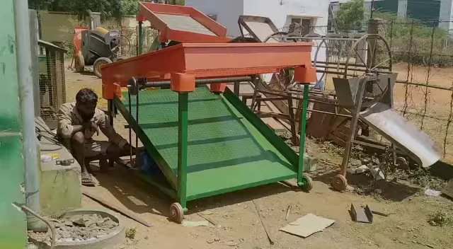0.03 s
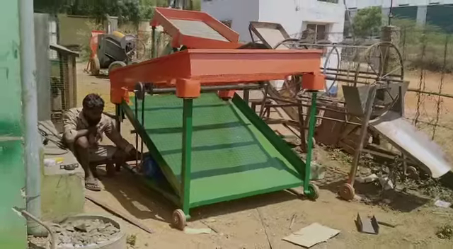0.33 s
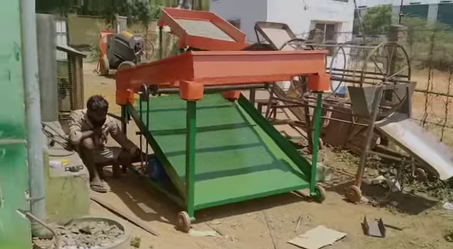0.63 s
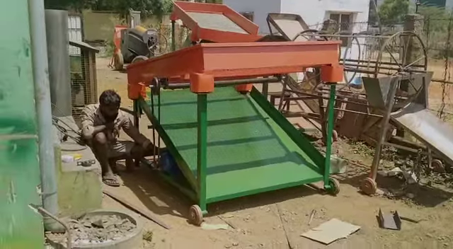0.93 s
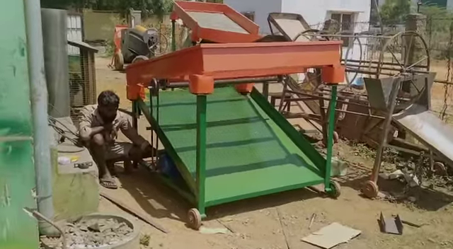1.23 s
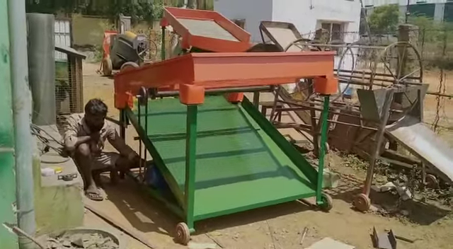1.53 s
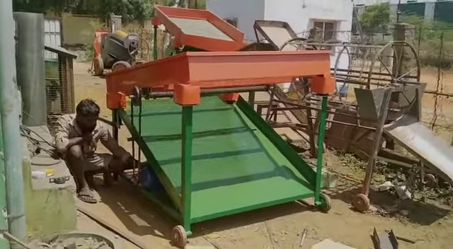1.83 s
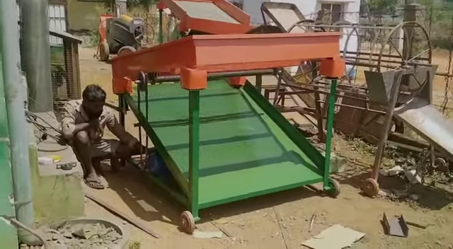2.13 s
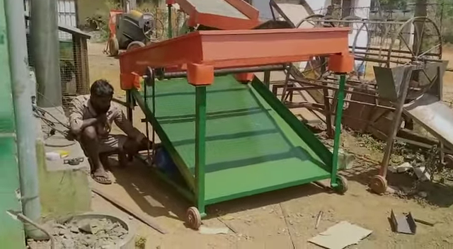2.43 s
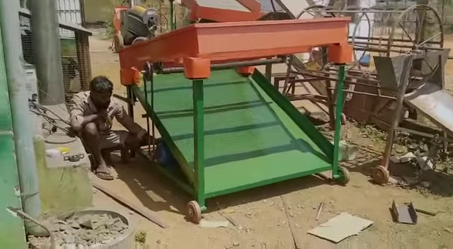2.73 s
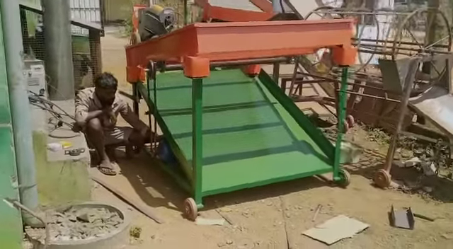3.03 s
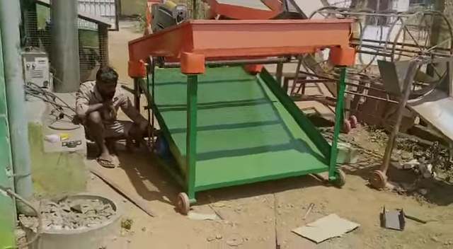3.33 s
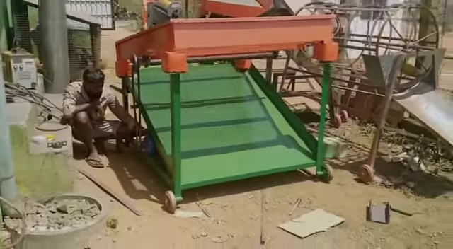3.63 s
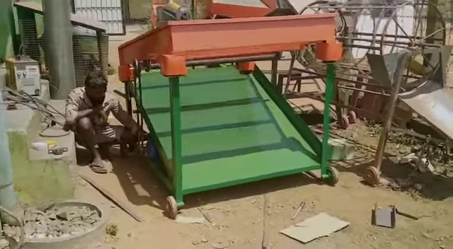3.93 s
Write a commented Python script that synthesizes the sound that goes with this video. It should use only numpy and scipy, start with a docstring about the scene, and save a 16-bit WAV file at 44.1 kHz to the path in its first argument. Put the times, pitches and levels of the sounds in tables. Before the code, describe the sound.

A sieving machine runs outdoors, heard from nearby. Bright metallic chatter swells and drops back twice, then swells again, while the motor hums underneath. Quick rasping strokes stand out in the gaps, and a loose part clinks once.

```python
"""Sieving machine in a yard

A motor-driven sieve shakes in the open air. Its steel screen chatters in surges: dense tiny
contacts sizzle in the mesh while heavier ones ring the tray and frame. In the lulls, strokes of
the shaker stand out as short rasps and a loose part clinks once, over the drive's hum and rumble."""
import sys
import numpy as np
from scipy import signal
from scipy.fft import rfft, irfft, next_fast_len
from scipy.io import wavfile
from scipy.ndimage import uniform_filter1d, map_coordinates

SR = 44100
rng = np.random.default_rng(int(sys.argv[2]) if len(sys.argv) > 2 else 0)


def wav_out(sig):
    """Save sig, one row per channel (or a flat mono array), as 16-bit PCM at SR to the path in sys.argv[1]."""
    wavfile.write(sys.argv[1], SR, np.round(np.clip(np.atleast_2d(sig).T, -1, 1) * 32767).astype(np.int16))


N = 176400

START_S, TOP_HZ = .111, 15750
STROKE_HZ, FIRST_STROKE_S = 12.42, .1422

# tone colour of the drive's rumble and rush (frequency [Hz], gain [dB])
DRIVE_COLOUR = [(15, -8), (25, -3), (50, -8), (84, -2), (148, -9), (216, -4.5), (290, -5), (360, -9.5),
                (460, -5), (560, -9.5), (670, -4.5), (850, -4), (1420, -9), (1670, -7), (2400, -10.5),
                (3360, -13.5), (3700, -16.5), (4900, -32), (7750, -26), (11600, -42), (15600, -27)]
# faders of the drive's noise (time [s], relative rumble level [dB], relative belt level [dB])
DRIVE_FADERS = [(0.12, -48, -54), (0.8, -43.5, -48.5), (1.5, -43.5, -43), (2.05, -41.5, -43),
                (2.25, -42.5, -44), (2.9, -43.5, -43), (3.3, -43.5, -43.5), (4.0, -45, -36.5)]
# hum lines of the drive (frequency [Hz], base level [dB])
HUM_LINES = [(74.8, -57.5), (99.3, -61), (136.5, -55.5), (200, -65)]
# fader of the hum as the machine gets nearer (time [s], gain [dB])
HUM_FADER = [(.12, 0.5), (1.2, -3), (2.3, .5), (3.0, -0.5), (4.0, 2.5)]
# a loose part clinks (time [s], relative level [dB])
CLINK_CUES = [(3.316, -31)]
# strokes that stand out as a rasp (time [s], relative level [dB])
RASP_CUES = [(0.7864, -26), (1.9954, -26.5), (2.0767, -26), (2.0974, -27.5), (2.156, -33), (2.7214, -25),
             (2.7975, -27), (2.8818, -27.5), (2.9624, -30), (3.042, -27), (3.122, -26), (3.2041, -31),
             (3.2829, -28.5)]
# the mesh breaks loose into chatter (time [s], relative level [dB])
CATCH_CUES = [(0.8415, -18.5), (2.2368, -22.5), (3.335, -22.5)]
# tone colour of a rasp (frequency [Hz], gain [dB])
RASP_COLOUR = [(500, -10), (1200, -3.5), (2500, 7.5), (4500, -2.5), (7500, 1), (10000, 0), (14300, 6.5),
               (15500, 5)]
# resonances of the steel screen (frequency [Hz], width [Hz], gain [dB])
STEEL_MODES = [(935, 46, -13), (1046, 55, -7.5), (1323, 24.5, -3), (1416, 50, 0), (1462, 45, .5),
               (1779, 83, -5.5), (1965, 74, -6), (2236, 137, -7), (2573, 123, -13), (3138, 38, -12),
               (4067, 64, -6), (4280, 130, -6), (4610, 99, -9.5), (5345, 51, -6.5), (5870, 99, -7),
               (6530, 52, -2), (7504, 110, -3.5), (7750, 90, -1.5), (8550, 180, -8), (10280, 180, -7.5),
               (11260, 210, -9), (12370, 200, -12), (13450, 60, -9), (14860, 190, -7)]
# borders between resonance groups 0 to 4: deep, low, mid, high, top (frequency [Hz])
MODE_GROUP_EDGES = [1200, 1650, 3500, 5000]
# fader of the tray's deep ring, near 1 kHz (time [s], level [dB])
DEEP_RING_FADER = [(.12, -49), (.3, -44.5), (.55, -40), (.75, -53), (1.0, -48), (1.35, -44), (1.55, -57),
                   (2.2, -60), (2.5, -57), (2.9, -58), (3.4, -60), (3.8, -49)]
# relative levels of the ring near 1.4, 2 and 4.2 kHz (time [s], low [dB], mid [dB], high [dB])
RING_FADERS = [(0.12, -37.5, -38.5, -36), (0.2, -38.5, -34.5, -37.5), (0.28, -32, -35, -35),
               (0.42, -32, -33, -32), (0.56, -32, -34.5, -31.5), (0.66, -38.5, -35.5, -39),
               (0.79, -46, -43, -47.5), (0.86, -36.5, -45, -42), (0.96, -36.5, -41, -44),
               (1.07, -35.0, -36, -36.5), (1.2, -34.5, -36.5, -32.5), (1.33, -36, -33, -33.5),
               (1.44, -37.5, -39.5, -45), (1.52, -34.5, -39.5, -40.0), (1.65, -31, -32.5, -44),
               (1.8, -34.5, -36, -43), (1.95, -44.5, -41, -49.5), (2.2, -52.0, -52, -57),
               (2.33, -42, -44, -46), (2.44, -32.5, -35, -38.5), (2.57, -32.5, -33.5, -36),
               (2.68, -40.5, -40, -42), (2.85, -46.5, -46, -47), (3.2, -62, -56, -69),
               (3.4, -48.5, -46.5, -46), (3.54, -32, -37, -36), (3.65, -37, -41.5, -38.5),
               (3.85, -36.5, -37.0, -35.5), (4.0, -39.5, -42, -39.5)]
# tone colour of the mesh contacts (frequency [Hz], gain [dB])
MESH_COLOUR = [(1530, -19), (2500, -8), (2950, -12.5), (3810, -9), (4200, -8), (4950, -8), (5550, -3),
               (6200, -3), (6600, -3), (7000, -1), (7650, 1), (8600, -1.5), (9500, -5.5), (10400, -7),
               (12100, -6), (14800, -2), (15700, -5.5)]
# relative levels of the surging chatter (time [s], lower treble [dB], upper treble [dB])
SURGE_FADERS = [(0.12, -28.5, -29), (0.2, -28, -28), (0.55, -27, -29.5), (0.65, -34.5, -38),
                (0.75, -39, -44), (0.83, -43.5, -46), (0.86, -36, -33.5), (1.0, -35, -35),
                (1.11, -27, -26.5), (1.35, -29, -28), (1.58, -29, -29.5), (1.71, -31.5, -34),
                (1.79, -29, -31.5), (1.88, -35.5, -39.5), (1.98, -42, -45.5), (2.225, -47, -48),
                (2.26, -43.5, -37.0), (2.33, -34, -33.5), (2.42, -28.5, -27), (2.58, -25.5, -27),
                (2.68, -31.5, -35), (2.78, -37.0, -45), (2.93, -46, -47), (3.18, -50.5, -54),
                (3.32, -48, -49), (3.36, -37.5, -37.5), (3.48, -30.0, -34.5), (3.62, -27, -29),
                (3.8, -27.0, -31), (3.93, -28.5, -31), (4.0, -29.5, -30.5)]


def amp(db):
    """Decibels to gain."""
    return 10 ** (np.asarray(db) / 20)


def unit(x):
    """Scale to rms 1."""
    return x / np.sqrt(np.mean(x ** 2) + 1e-20)


def clock():
    """Time of each sample, in seconds."""
    return np.arange(N) / SR


def faders(rows):
    """One automation curve for each column after the time."""
    times, *columns = np.transpose(rows)
    return [np.interp(clock(), times, column) for column in columns]


def wobble(rate):
    """A smooth random curve, rate knots a second."""
    return map_coordinates(rng.standard_normal(4096), [clock() * rate], mode="wrap")


def swing(harmonic):
    """A cosine at a multiple of the shaker's stroke rate."""
    return np.cos(2 * np.pi * harmonic * STROKE_HZ * (clock() - FIRST_STROKE_S))


def bursts(cues, attack_s, hold_s, fall_db_per_s):
    """Envelope of short events: attack, hold, release."""
    ages = [(np.maximum(clock() - onset, 0), db) for onset, db in cues]
    return sum(np.minimum(age / attack_s, 1) * amp(db - fall_db_per_s * np.maximum(age - hold_s, 0))
               for age, db in ages)


def filtered(x, response):
    """x through a complex frequency response."""
    size = next_fast_len(N + SR // 2)
    return irfft(rfft(x, size) * response(np.fft.rfftfreq(size, 1 / SR)), size)[:N]


def coloured(x, colour):
    """x through an EQ curve, at rms 1."""
    hz, db = np.transpose(colour)
    return unit(filtered(x, lambda f: amp(np.interp(np.log(f + 1), np.log(hz + 1), db))))


def split(x, hz):
    """A steep crossover: the parts of x below and above hz."""
    low = filtered(x, lambda f: 1 / (1 + (f / hz) ** 30))
    return low, x - low


def shimmer(x, depth_db, size=1024):
    """Peaks come and go, as among steel's many close modes; a larger size is finer and slower."""
    spectrum = signal.stft(x, nperseg=size)[2]
    patches = uniform_filter1d(rng.standard_normal(spectrum.shape), size=3, axis=0)  # across pitch
    patches = uniform_filter1d(patches, size=18, axis=1)  # across time
    return unit(signal.istft(spectrum * amp(depth_db * unit(patches)), nperseg=size)[1][:N])


def contacts(rate, spread_db):
    """Randomly timed impacts of uneven size, rate a second."""
    clicks = (rng.random(N) < rate / SR) * rng.choice([-1, 1], N)
    return unit(clicks * amp(spread_db * rng.standard_normal(N)))


def drive_rush():
    """The noise bed: motor rumble and brighter belt rush, pulsing gently twice a stroke."""
    rumble_db, belt_db = faders(DRIVE_FADERS)
    noise = shimmer(rng.standard_normal(N), depth_db=1.77, size=4096)
    rumble, belt = split(coloured(noise, DRIVE_COLOUR), hz=1400)
    flutter_db = .5 * wobble(60) + .5 * swing(harmonic=2)
    return (amp(rumble_db) * rumble + amp(belt_db) * belt) * amp(4 + flutter_db)


def drive_hum():
    """The drive hums on a few lines, each a little unsteady in level and phase."""
    fader_db, = faders(HUM_FADER)
    hum = np.zeros(N)
    for hz, db in HUM_LINES:
        peak = np.sqrt(2) * amp(db + 1.1 * wobble(4.1))
        hum += peak * np.sin(2 * np.pi * hz * clock() + .66 * wobble(7))
    return amp(fader_db) * hum


def clink(pitch_hz=3900, width_hz=300):
    """A loose part gives a brief, narrow steel ring."""
    ring = filtered(rng.standard_normal(N), lambda f: np.exp(-((f - pitch_hz) / width_hz) ** 2))
    return amp(-9) * bursts(CLINK_CUES, attack_s=.001, hold_s=.004, fall_db_per_s=2500) * unit(ring)


def stroke_rasps():
    """The mesh rasps at the turn of a stroke, and for longer where a surge catches."""
    rasps = amp(-9) * bursts(RASP_CUES, attack_s=.0016, hold_s=.005, fall_db_per_s=450)
    catches = amp(-11) * bursts(CATCH_CUES, attack_s=.0015, hold_s=.011, fall_db_per_s=200)
    return (rasps + catches) * coloured(contacts(rate=14000, spread_db=1.5), RASP_COLOUR)


def steel_ring(shake_db, group, skirt_octaves):
    """Heavy contacts ring one group of steel resonances, at rms 1; the skirt limits their reach."""
    hits = contacts(rate=1800, spread_db=1) * amp(1.6 * shake_db + .6 * swing(harmonic=3))
    modes = [mode for mode in STEEL_MODES if np.searchsorted(MODE_GROUP_EDGES, mode[0]) == group]

    def response(f):
        total = 0
        for k, (hz, width, db) in enumerate(modes):
            resonance = 1j * f * width / (hz * hz - f * f + 1j * f * width)
            skirt = 1 + (np.log2((f + 1) / hz) / skirt_octaves) ** 2
            total += (-1) ** k * amp(db) * resonance / skirt
        return total
    return unit(filtered(hits, response))


def tray_ring(shake_db):
    """The body of the chatter: tray and frame ring in four registers under the heavy contacts."""
    deep_db, = faders(DEEP_RING_FADER)
    low_db, mid_db, high_db = faders(RING_FADERS)
    deep = steel_ring(shake_db, group=0, skirt_octaves=.26)
    low = steel_ring(shake_db, group=1, skirt_octaves=.56)
    mid = shimmer(steel_ring(shake_db, group=2, skirt_octaves=.69), depth_db=3, size=2048)
    high = shimmer(steel_ring(shake_db, group=3, skirt_octaves=.12), depth_db=2.4, size=2048)
    return (amp(deep_db) * deep + amp(low_db + .06) * low
            + amp(mid_db - .3) * mid + amp(high_db - .86) * high)


def mesh_sizzle(shake_db):
    """The bright edge of the chatter: dense tiny contacts in the mesh, plus the steel's top ring."""
    lower_db, upper_db = faders(SURGE_FADERS)
    grains = contacts(rate=14000, spread_db=3) * amp(shake_db)
    fizz = coloured(shimmer(grains, depth_db=1.9, size=4096), MESH_COLOUR)
    top_ring = amp(-6) * steel_ring(shake_db, group=4, skirt_octaves=.25)
    lower, upper = split(shimmer(fizz + top_ring, depth_db=2.16), hz=8740)
    return amp(lower_db + .06) * unit(lower) + amp(upper_db + 1.87) * unit(upper)


def screen_chatter():
    """Mesh and tray chatter together; the shaking swells and eases the force of their contacts."""
    shake_db = .5 * wobble(75) + .25 * wobble(350) + .1 * swing(harmonic=1) + .19 * swing(harmonic=2)
    return mesh_sizzle(shake_db) + tray_ring(shake_db)


def scene():
    """The machine from a few steps away, the same in both ears."""
    machine = screen_chatter() + stroke_rasps() + clink() + drive_rush() + drive_hum()
    return np.tile(machine, (2, 1))


def record(dry):
    """The sound cuts in abruptly and has nothing above TOP_HZ."""
    gate = np.clip((clock() - START_S) * SR / 64, 0, 1)  # opens in 64 samples
    return np.array([filtered(channel * gate, lambda hz: hz < TOP_HZ) for channel in dry])


dry = scene()
out = record(dry)
wav_out(out)
```